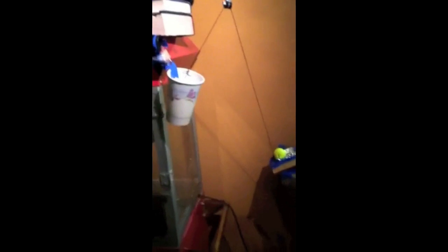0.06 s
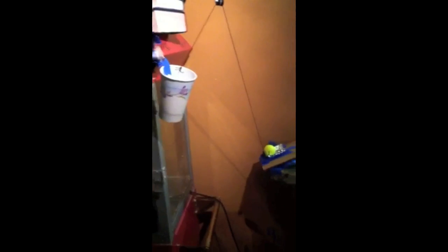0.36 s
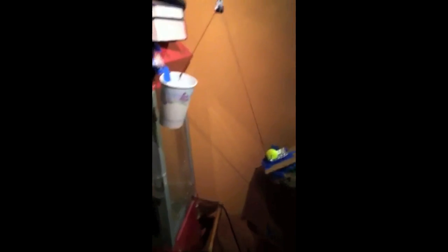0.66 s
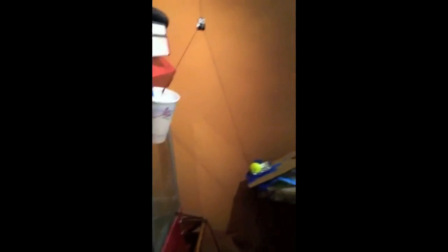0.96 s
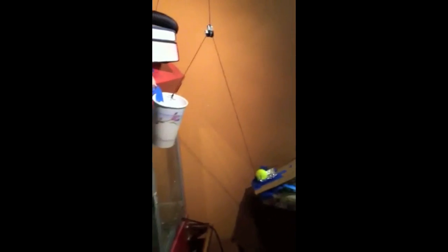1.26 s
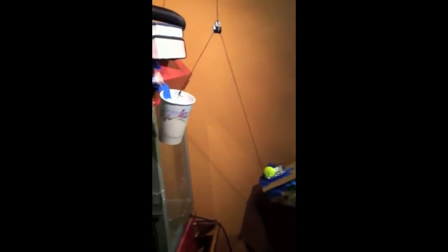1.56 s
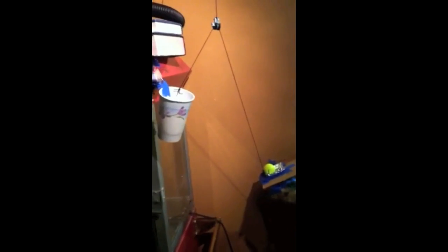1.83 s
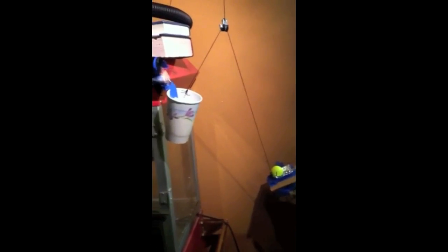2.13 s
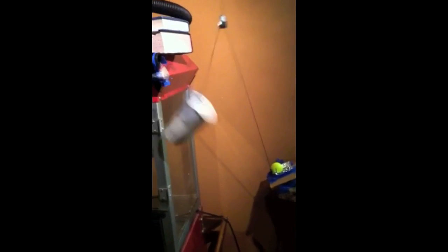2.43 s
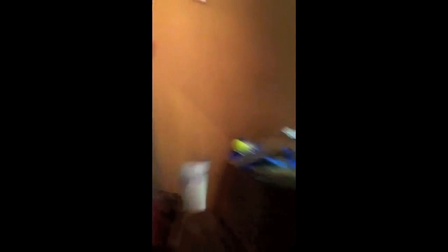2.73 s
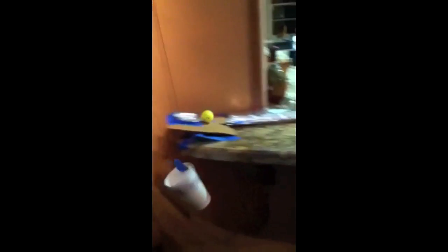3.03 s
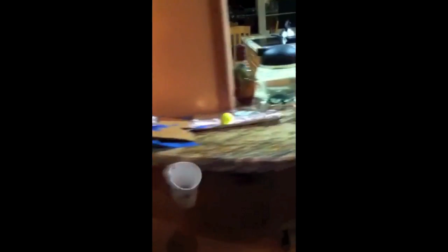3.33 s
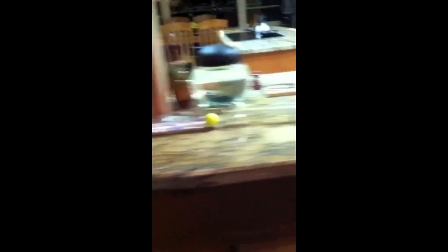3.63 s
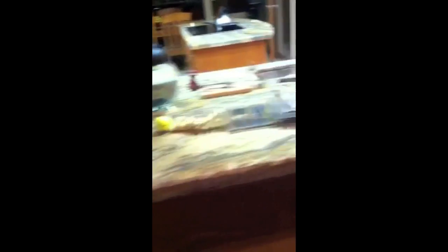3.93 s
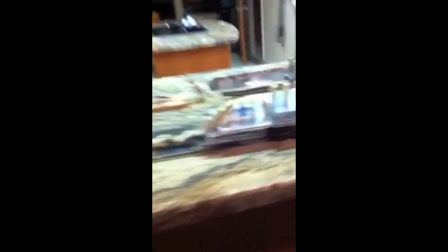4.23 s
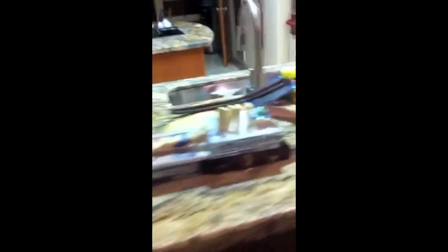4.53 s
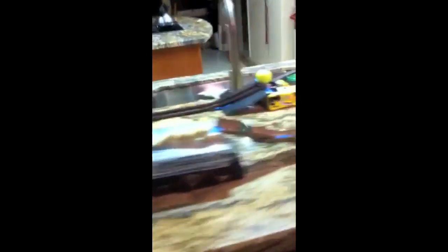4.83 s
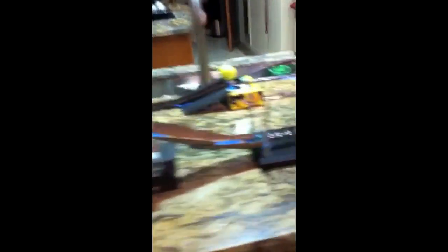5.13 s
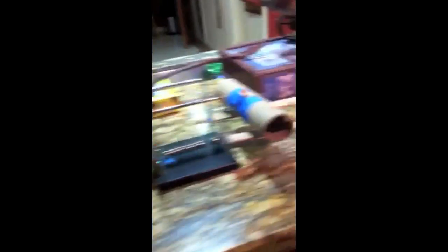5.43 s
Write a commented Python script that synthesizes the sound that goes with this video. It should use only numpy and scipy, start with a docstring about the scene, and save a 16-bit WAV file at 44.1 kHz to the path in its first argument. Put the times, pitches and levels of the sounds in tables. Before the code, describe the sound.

A marble ticks and hums faintly down a ribbed hose, with a few light plastic knocks. A string suddenly snatches and whirs over a pulley as a cup drops. Dull thumps follow, a tennis ball rolls on a stone counter, and a row of dominoes topples with bright clinks, rattling onto a hollow tray. Two hollow clacks and some small clicks finish it, heard nearby in a quiet kitchen.

```python
"""A homemade chain-reaction machine in a quiet kitchen. A marble ticks and hums down a ribbed hose, amid
a few plastic knocks, and drops into a hanging cup. At 2.4 s the cup sinks, its string snatching and
whirring over a pulley, and tips a ramp. A tennis ball thumps onto the stone counter, rolls, and at 3.7 s
topples a row of hard dominoes, which clink and clatter onto a hollow tray. From 4.6 s a hollow part
clacks twice; a few light parts click and jiggle to rest."""
import sys
import numpy as np
from scipy import signal
from scipy.io import wavfile

SR = 44100
rng = np.random.default_rng(int(sys.argv[2]) if len(sys.argv) > 2 else 0)


def put_to_file(sound):
    """Save the sound as 16-bit audio at rate SR, in the file named by the first command-line argument."""
    columns = np.atleast_2d(sound).T  # one column per channel
    safe = np.clip(columns, -1, 1)
    whole_steps = np.round(safe * 32767)
    wavfile.write(sys.argv[1], SR, whole_steps.astype(np.int16))


N = 250488
T = np.arange(N) / SR


def amp(db):
    return 10 ** (np.asarray(db) / 20)


def unit(x):
    return x / np.sqrt(np.mean(x ** 2) + 1e-20)


def sized(x, db):
    """Scale a blow to the energy of 10 ms at this level."""
    return amp(db) * x * np.sqrt(SR / 100) / np.linalg.norm(x)


def add(mix, s, sound):
    part = mix[max(round(s * SR), 0):][:len(sound)]
    part += sound[:len(part)]


def read(points, hz):
    """Interpolate on a log-frequency axis."""
    f, value = np.transpose(points)
    return np.interp(np.log(hz + 1), np.log(f + 1), value)


def soften(x, hz, order=2):
    return signal.lfilter(*signal.butter(order, min(hz, SR / 2 - 1), fs=SR), x)


def no_bass(x, hz):
    return signal.lfilter(*signal.butter(2, hz, "high", fs=SR), x)


def colour(x, spectrum, size=4096):
    """Causal filter; rows of f/Hz, level/dB."""
    hz = abs(np.fft.fftfreq(size, 1 / SR))
    log_gain = np.log(amp(np.maximum(read(spectrum, hz), -90)))
    taps = np.fft.ifft(np.exp(np.conj(signal.hilbert(log_gain)))).real[:size // 2]
    return signal.oaconvolve(x, taps)[:len(x)]


def resonate(x, modes, scale=1):
    """Parallel resonances; scale multiplies their centres, not their widths."""
    return sum(amp(db) * signal.lfilter(*signal.iirpeak(scale * f, scale * f / width_hz, SR), x)
               for f, width_hz, db in modes)


def glide(x, curve, width_hz):
    """One moving resonance; rows of t/s, f/Hz."""
    carrier = np.exp(2j * np.pi * np.cumsum(np.interp(T, *np.transpose(curve))) / SR)
    r = np.exp(-np.pi * width_hz / SR)
    return (carrier * signal.lfilter([(1 - r) ** 2], [1, -2 * r, r * r], x / carrier)).real


def ringing(modes, hz, size=16384):
    """Decaying sines of a struck body."""
    t = T[:size]
    return sum(amp(db) * np.sin(2 * np.pi * hz * ratio * t) * amp(-60 * t / t60_s)
               for ratio, db, t60_s in modes)


def contact(rattle_s, snap, rise_s=.0001, size=8192):
    """Impact force: a spike of height snap, then a dying rattle of tiny rebounds."""
    t = T[:size]
    force = rng.standard_normal(size) * np.exp(-t / rattle_s) * (1 - np.exp(-t / rise_s))
    force /= np.linalg.norm(force)
    force[0] += snap
    return force


def grains(per_s, spread_db):
    """Random tiny impacts of uneven size."""
    size = amp(spread_db * np.minimum(rng.exponential(1, N), 3)) * rng.choice([-1, 1], N)
    return unit(size * (rng.random(N) < per_s / SR))


def after(s, fade_db_per_s):
    """Gain of 1 that fades from time s on."""
    return amp(-fade_db_per_s * np.maximum(T - s, 0))


def swell(start_s, peak_s, build_db, fade_db_per_s):
    """Gain gated on at start_s; builds to 1 at peak_s, then fades. An earlier peak leaves only fade."""
    gate = np.clip((T - start_s) / .003, 0, 1)
    growth_db = build_db * np.clip((T - peak_s) / max(peak_s - start_s, .001), -1, 0)
    return gate * amp(growth_db) * after(peak_s, fade_db_per_s)


# kitchen reverberation: f/Hz, t60/s
ROOM_DECAY = [(150, .48), (400, .4), (1000, .4), (3000, .42), (7000, .41), (15000, .36)]

def room(x, wet_db, size=30000):
    """Direct sound plus dense reflections that die band by band; power is kept."""
    reflections = rng.standard_normal(size) * (rng.random(size) < 5000 / SR) * (T[:size] > .003)
    hz, t, bands = signal.stft(reflections, SR, nperseg=256)
    decay = amp(-60 * t / read(ROOM_DECAY, hz)[:, None])
    tail = signal.istft(bands * decay, SR, nperseg=256)[1]
    wet = signal.fftconvolve(x, tail / np.linalg.norm(tail))[:N]
    return (x + amp(wet_db) * wet) / np.sqrt(1 + amp(wet_db) ** 2)


# kitchen air: f/Hz, level/dB
AIR_SPECTRUM = [(25, -8), (90, -11), (160, 2), (400, 1.5), (1000, -11), (3000, -14), (9000, -22),
                (16000, -44)]

def kitchen_air():
    """Faint, steady, low noise."""
    return amp(-64) * unit(colour(rng.standard_normal(N), AIR_SPECTRUM))


# marble speed: t/s, rate/(ribs/s)
MARBLE_SPEED = [(0.0, 60.68), (0.2, 54.0), (0.4, 51.94), (0.6, 51.99), (0.8, 46.13), (1.0, 35.38),
                (1.2, 30.63), (1.35, 30.12), (1.5, 34.4), (1.7, 34.61), (1.85, 40.82), (2.0, 36.47),
                (2.13, 47.92)]
# ring of the ribs along the hose: t/s, f/Hz
RIB_PITCH = [(0, 6900), (1.0, 6730), (1.76, 6600), (1.86, 5770), (1.9, 5300), (1.96, 6000)]
# rib ticks and hose wall: f/Hz, level/dB
TICK_SPECTRUM = [(530, -7.5), (900, -2), (1480, -24), (1840, -9.5), (2700, -13.5), (3760, -15.5),
                 (5980, -15.5), (6900, -15.5), (9200, -20), (10600, -18), (15500, -37)]
WALL_SPECTRUM = [(50, -36), (100, -5), (160, 2.5), (220, -3.5), (280, -9), (365, 3.5), (430, 1), (510, 5),
                 (640, 4.5), (830, -3), (1400, -10), (1850, -14.5), (3500, -39)]
# air resonances of the hose: f/Hz, width/Hz, level/dB
BORE_MODES = [(157.4, 8.3, 5), (226.6, 3.4, 12.5), (365, 3.9, -2), (511.5, 30, -2.5), (612, 5.7, 5),
              (714, 17, -3)]
CRUISE_RIBS_PER_S, NEARING_S = 45.3, 0.1
EXIT_S, EXIT_DB_PER_S = 2.205, 373

def marble():
    """The marble drops into each groove of the hose: a tick, and a push on the hollow wall."""
    speed = np.interp(T, *np.transpose(MARBLE_SPEED))
    ribs = np.cumsum(speed) / SR + .52
    since_rib_s = (ribs % 1) / speed
    force, sharpness = rng.standard_normal((N, 2))[ribs.astype(int)].T  # one draw per rib
    pulse = (np.exp(-since_rib_s / .006) + .1) * (1 - np.exp(-since_rib_s / .001))
    blows = unit(amp(1.5 * force) * pulse)
    grit = blows * grains(per_s=9800, spread_db=-1.5)
    dull = soften(grit, 5800, order=1)
    bright = amp(2.5 * sharpness) * (grit - dull)
    ticks = unit(colour(dull + bright, TICK_SPECTRUM)) * rolling(speed, power=1.6, mouth_db=7.5)
    ring = unit(glide(grit, RIB_PITCH, width_hz=1100)) * rolling(speed, power=1.5, mouth_db=-15)
    scrape = unit(resonate(grit, [(2000, 590, -1.2), (2800, 640, -0.82)]))
    scrape *= swell(1.85, 2.13, build_db=7.5, fade_db_per_s=120)
    push = (blows + .5) * rng.standard_normal(N)
    wall = unit(colour(push + amp(4) * resonate(push, BORE_MODES), WALL_SPECTRUM))
    wall *= rolling(speed, power=0.79, mouth_db=14.5)
    contacts = amp(-60) * (ticks + amp(-17) * ring) + amp(-62.5) * scrape
    return room(contacts, wet_db=-6) + room(amp(-54.5) * wall, wet_db=-2)


def rolling(speed, power, mouth_db):
    """Marble gain: a power of its speed, shifted by mouth_db towards the open end of the hose."""
    nearness = np.exp(np.minimum(T - EXIT_S, 0) / NEARING_S)
    return (speed / CRUISE_RIBS_PER_S) ** power * amp(mouth_db * nearness) * after(EXIT_S, EXIT_DB_PER_S)


# hose notes: peak t/s, half length/s, f/Hz, level/dB
HOSE_NOTES = [(0.144, 0.15, 223, -55.5), (.2, 0.17, 625, -64), (0.348, .07, 760, -61.5),
              (0.463, .13, 159, -60), (.46, 0.1, 376, -58), (1.683, 0.077, 500, -56),
              (1.786, 0.047, 772, -58.5), (1.924, 0.18, 154, -59.5), (2.164, 0.064, 633, -48.5),
              (2.174, 0.095, 505, -49)]

def hums():
    """The rolling marble feeds one air resonance of the hose after another."""
    out = np.zeros(N)
    for peak_s, half_s, hz, db in HOSE_NOTES:
        note = unit(glide(rng.standard_normal(N), [(0, hz)], width_hz=20.5))
        out += amp(db) * note * np.exp(-((T - peak_s) / half_s) ** 2)
    return out * after(EXIT_S, EXIT_DB_PER_S)


# knocks on plastic: t/s, relative level/dB, cut-off/Hz, shell f/Hz, rattle/s
SHELL_HITS = [(.607, -33.5, 754, 417, 0.00042), (0.698, -34.5, 3300, 525, 0.0011),
              (0.714, -38, 2930, 453, 0.0012), (0.746, -48, 2600, 483, 0.0029),
              (0.998, -41.5, 1180, 350, 0.0072)]
# thin shell: frequency ratio, width/Hz, level/dB
SHELL_MODES = [(1, 200, 0), (1.3, 200, -6), (2.1, 500, -11), (3.15, 600, -5), (5.5, 1400, -11)]

def knocks():
    """Short, nearly dead knocks on thin hollow plastic."""
    out = np.zeros(N)
    for s, db, cutoff_hz, hz, rattle_s in SHELL_HITS:
        push = soften(contact(rattle_s, snap=0.31), cutoff_hz, order=6)
        knock = resonate(no_bass(push, 0.34 * hz), SHELL_MODES, scale=hz)
        add(out, s, sized(knock, db - 8))
    return room(out, wet_db=-11)


# jolts: t/s, level/dB, f/Hz, rise/s
JOLTS = [(0.696, -40, 290, 0.0003), (.717, -42, 200, 0.0013), (2.426, -35, 228, 0.0024),
         (2.49, -43, 163, 0.014), (2.799, -47, 234, .005), (2.807, -44, 338, 0.0029),
         (2.887, -35.5, 225, 0.002), (2.914, -39, 337, 0.0018), (3.049, -35.5, 198, 0.0098),
         (3.06, -45, 70, 0.0032), (3.113, -46, 252, .005), (3.139, -44, 224, 0.0034),
         (5.605, -58.5, 160, 0.013)]

def bumps():
    """A jolted part sways as a whole for a few cycles: a low, round bump."""
    out, t = np.zeros(N), T[:8192]
    for s, db, hz, rise_s in JOLTS:
        sway = t / rise_s * np.exp(-t / rise_s) * np.sin(2 * np.pi * hz * t)
        add(out, s, sized(no_bass(sway, 0.74 * hz), db))
    return room(out, wet_db=-5)


# small parts touching, and the sharpest cracks of colliding tiles: t/s, relative level/dB, rattle/s, low cut/Hz
CLICK_HITS = [(1.088, -55, 0.004, 5000), (1.278, -55, 0.0045, 3000), (1.3422, -51.5, 0.0043, 3000),
              (1.8617, -50.5, 0.0021, 4500), (1.911, -58, 0.0025, 3500), (1.9332, -54, 0.0017, 4450),
              (1.963, -55, .003, 2000), (2.013, -54, .003, 1500), (2.14, -41.5, 0.0053, 2950),
              (2.208, -42, 0.0077, 1500), (2.384, -29.5, 0.0076, 500), (2.881, -31, 0.016, 1000),
              (3.046, -26, 0.0091, 1380), (3.066, -37, 0.0025, 900), (3.2015, -36, 0.019, 7650),
              (3.251, -35, 0.035, 2010), (3.42, -35, 0.021, 7040), (3.608, -45, 0.028, 3930),
              (3.7101, -21, 0.00024, 2040), (3.748, -23, 0.0014, 9050), (3.753, -17.5, 0.0062, 9300),
              (4.371, -26.5, 0.0081, 9000), (4.423, -17.5, 0.0091, 3870), (4.642, -35, 0.0062, 9002),
              (4.799, -26, 0.014, 1100), (4.836, -27, 0.0057, 895), (4.86, -30, 0.0009, 1510),
              (4.886, -22.5, 0.0089, 10600), (4.933, -27, 0.0089, 9500), (5.0122, -23.5, 0.00052, 2170),
              (5.018, -20, 0.009, 3350), (5.251, -40, 0.014, 4070), (5.2736, -27, 0.0095, 4960),
              (5.337, -35.5, 0.0034, 1200), (5.393, -37, 0.0077, 2030), (5.559, -42.5, 0.032, 1490),
              (5.646, -50, 0.036, 3080)]
# hard contact: f/Hz, level/dB
CLICK_SPECTRUM = [(100, -17), (500, 5.5), (900, 4), (2000, 0.5), (4000, -1.5), (6800, 2), (10000, -2.5),
                  (13000, -12.5), (15800, -27)]

def clicks():
    """Small hard parts touch and rebound, and toppling tiles crack sharply; the smaller the part, the thinner
    its click."""
    out = np.zeros(N)
    for s, db, rattle_s, low_hz in CLICK_HITS:
        click = colour(contact(rattle_s, snap=0.36), CLICK_SPECTRUM)
        add(out, s, sized(no_bass(click, low_hz), db - 7))
    return room(out, wet_db=-7)


# string snatches: t/s, added gain/dB, decay/s
STRING_JERKS = [(2.43, -2, 0.014), (2.472, -13, .01), (2.494, 3, 0.019), (2.543, -9, 0.0066),
                (2.579, -18, 0.0058), (2.599, 0.5, 0.032), (2.655, -2, 0.02), (2.718, -1, 0.011)]
# string friction: f/Hz, level/dB
HISS_SPECTRUM = [(710, -21), (1200, -18), (1520, 6), (1680, -3), (1870, -3), (2320, -7.5), (9210, -5),
                 (12300, -12), (15800, -27)]
# hanging cup: f/Hz, width/Hz, level/dB
CUP_MODES = [(165, 25, -17), (232, 40, -13), (275, 30, -15), (460, 60, -14), (635, 50, -3), (747, 42, -2),
             (835, 60, -6), (950, 60, -10), (1070, 45, -6), (1130, 45, -8), (1240, 60, -16),
             (1510, 70, -12), (1860, 90, -12), (2060, 70, -18), (2470, 80, -21)]
# string whirr and pulley squeak: t/s, f/Hz
WHIRR_PITCH = [(2.38, 750), (2.5, 754), (2.55, 860), (2.66, 820), (2.73, 735), (2.8, 713)]
SQUEAK_PITCH = [(2.43, 1800), (2.5, 1860), (2.54, 1900), (2.57, 2020), (2.62, 2050)]
PULL_S, FASTEST_S, WHIRR_PEAK_S, STOP_S = 2.381, 2.486, 2.592, 2.805

def pulley():
    """The string slips and snatches over the squeaking pulley; the cup drones like a soundboard."""
    slips = grains(per_s=1800, spread_db=1)
    jerks = sum(amp(db) * (T > s) * np.exp(-np.maximum(T - s, 0) / decay_s)
                for s, db, decay_s in STRING_JERKS)
    rub = amp(-39) * swell(PULL_S, FASTEST_S, build_db=0.5, fade_db_per_s=17.5)
    surge = amp(-32) * swell(PULL_S, FASTEST_S, build_db=24, fade_db_per_s=210)
    hiss = unit(colour(slips, HISS_SPECTRUM)) * (rub + surge)
    hiss *= (1 + 0.5 * jerks) * after(STOP_S, fade_db_per_s=598)
    cup_radiation = [(60, -38), (200, 3), (500, -0.5), (750, 5.5), (3000, -4.5)]  # f/Hz, level/dB
    drone = unit(colour(resonate(slips, CUP_MODES), cup_radiation))
    drone *= amp(-30) * swell(PULL_S, FASTEST_S, build_db=3, fade_db_per_s=66)
    whirr = unit(glide(slips, WHIRR_PITCH, width_hz=190))
    whirr *= amp(-40) * swell(PULL_S, WHIRR_PEAK_S, build_db=4, fade_db_per_s=90)
    squeak = unit(glide(slips, SQUEAK_PITCH, width_hz=220))
    squeak *= amp(-42.5) * swell(PULL_S, FASTEST_S, build_db=11, fade_db_per_s=88)
    tones = (drone + whirr + squeak) * (1 + jerks) * after(STOP_S, fade_db_per_s=193)
    return room(hiss, wet_db=-6) + room(tones, wet_db=-12)


# blows of cup, ramp and ball: t/s, relative level/dB, cut-off/Hz, rattle/s, ring f/Hz, ring offset/dB
SOFT_HITS = [(2.495, -30, 592, 0.0032, 620, -8), (2.803, -45, 500, 0.018, 547, -11),
             (2.872, -27, 700, 0.0049, 763, -12), (2.885, -22.5, 1640, 0.01, 557, -15),
             (3.05, -14.5, 1140, 0.0049, 600, -4), (3.112, -30, 1100, 0.0073, 607, -8),
             (3.265, -40.5, 826, 0.022, 700, -1), (3.316, -29.5, 990, 0.027, 730, -8),
             (3.363, -29.5, 1050, 0.035, 687, -11), (3.492, -33, 920, 0.035, 782, -10.5),
             (3.678, -31, 1540, 0.03, 649, -9)]
# ramp on the counter: frequency ratio, level/dB, t60/s
RAMP_MODES = [(.352, -16, .16), (.607, -13, .06), (.79, -12, .07), (.945, -4, .07), (1, -1, .12),
              (1.11, -2, .07), (1.51, -6, .11), (1.83, -9, .1), (2.02, -13, .07), (2.54, -19, .08),
              (2.85, -16, .09), (3.43, -22, .05)]
# dull rattle of loose parts: f/Hz, level/dB
THUD_SPECTRUM = [(30, -34), (110, -28), (190, -12), (270, -8), (360, -6), (420, -8), (520, -1), (640, 0),
                 (750, -6), (890, -2), (1010, -8), (1150, -5), (1400, -10), (1800, -8), (2300, -12),
                 (3200, -11), (6000, -12), (12000, -20)]
FIRST_HOP_S, HOP_RATIO, HOP_RATTLE_S = 0.037, 0.92, 0.031
FIRST_LOSS_DB, NEXT_LOSS_DB = 17.5, 6.5

def thumps():
    """Soft heavy blows rattle loose parts and ring the ramp, then bounce in three shrinking hops."""
    out = np.zeros(N)
    for s, db, cutoff_hz, rattle_s, hz, ring_db in SOFT_HITS:
        ramp = ringing(RAMP_MODES, hz)
        ramp *= (1 - np.exp(-T[:len(ramp)] / 0.0016)) ** 2
        for hop in range(4):
            rebounds = soften(contact(rattle_s, snap=0.17, rise_s=0.00092), cutoff_hz)
            push = contact(rattle_s, snap=0.0081 / rattle_s)
            ring = soften(signal.fftconvolve(push, ramp), 1.6 * cutoff_hz)
            add(out, s, sized(colour(rebounds, THUD_SPECTRUM), db - 5))
            add(out, s - .003, sized(ring, db - 4 + ring_db))
            s += FIRST_HOP_S * HOP_RATIO ** hop
            db -= NEXT_LOSS_DB if hop else FIRST_LOSS_DB
            rattle_s = HOP_RATTLE_S
    return room(out, wet_db=-6)


# loose parts jiggling: t/s, length/s, initial level/dB
JIGGLE_SPANS = [(3.34, 0.48, -56.5), (5.241, 0.19, -48.5), (5.378, 0.1, -54), (5.626, 0.073, -53.5)]

def jiggles():
    """Jolted parts tick faintly at random as they come to rest."""
    gain = sum(amp(db) * (T > s) * (T < s + length_s) * after(s, fade_db_per_s=31)
               for s, length_s, db in JIGGLE_SPANS)
    ticks = colour(grains(per_s=460, spread_db=10), CLICK_SPECTRUM)
    return room(unit(no_bass(ticks, 2720)) * gain, wet_db=0)


# hollow ball: f/Hz, width/Hz, level/dB
BALL_MODES = [(403, 61, -11), (580, 20, -8), (667, 11, 3)]
# its main note: t/s, f/Hz
BALL_PITCH = [(3.7, 315), (3.98, 304), (4.12, 354)]

def ball():
    """The rolling tennis ball rumbles and fades; its note dips, then rises."""
    grit = grains(per_s=830, spread_db=-6.5)
    note = unit(glide(grit, BALL_PITCH, width_hz=47))
    body = unit(no_bass(soften(resonate(grit, BALL_MODES), 1100), 260))
    gain = amp(-46.5) * swell(3.68, 3.55, build_db=1.5, fade_db_per_s=16.5)  # enters already fading
    return room((note + amp(2) * body) * gain, wet_db=-17)


# hardest domino collisions: t/s, relative level/dB, f/Hz, rattle/s
TILE_HITS = [(3.686, -36, 7300, 0.003), (3.7098, -10.5, 7020, .002), (3.715, -11, 8200, 0.0044),
             (3.7228, -11, 7240, 0.0032), (3.7474, -19, 7300, 0.0038), (3.7792, -11.5, 8100, 0.0017),
             (3.788, -10, 7094, 0.0016), (3.8165, -21, 8000, .001), (3.860, -9.5, 7240, 0.0093),
             (3.891, -8, 7190, 0.0018), (3.8968, -2.5, 7180, 0.0053), (3.9073, -11, 6910, 0.0029),
             (3.9152, -11, 7230, 0.0015), (3.9434, -8.5, 6800, 0.005), (3.9605, -6.5, 7070, 0.001),
             (3.9665, -10.5, 6960, 0.002), (3.98, -14, 7070, .001), (3.987, -12, 7420, .001),
             (3.9984, -5.5, 7220, 0.0055), (4.019, -17, 7290, 0.0022), (4.055, -14, 7320, 0.0021),
             (4.0812, -10.5, 7070, 0.0047), (4.127, -11.5, 7110, 0.0021), (4.1769, -12.5, 7030, 0.0036),
             (4.246, -17.5, 7060, 0.00074), (4.2827, -24.5, 6980, 0.0019), (4.3029, -14.5, 7060, 0.0032),
             (4.336, -14, 6840, 0.0047), (4.370, -12, 6890, .006), (4.3884, -11, 6840, 0.0007),
             (4.398, -12, 6860, 0.0034), (4.407, -15, 7020, 0.0011), (4.4105, -19, 7030, 0.00079),
             (4.436, -18, 7900, 0.0026), (4.4437, -15, 7230, 0.0014), (4.4637, -14, 8380, 0.0014),
             (4.479, -20, 7500, 0.0018), (4.5394, -19.5, 6820, 0.0011), (4.5725, -20, 6870, 0.0039),
             (4.6066, -18.5, 6750, 0.004), (4.643, -8.5, 7380, 0.0066), (4.8617, -17.5, 7060, 0.01),
             (4.885, -12.5, 6970, 0.0025), (4.932, -12.5, 7030, 0.0092), (4.9828, -12, 7110, 0.012),
             (5.0098, -17, 7000, 0.0049), (5.019, -22, 6920, 0.0039)]
# one tile: frequency ratio, level/dB, t60/s
TILE_MODES = [(1, 0, .05), (.965, -9, .03), (1.035, -9, .03), (1.085, -18, .025), (1.125, -14, .025),
              (1.18, -15, .02), (1.33, -19, .015)]
FREE_TILE_HZ, HALF_RING_OFFSET_HZ = 7020, 340
TILE_RISE_S, SCUFF_S = .0003, .007

def dominoes():
    """Each collision cracks and rings a tile; no two strike the same spot, so the partials vary."""
    rings, cracks = np.zeros((2, N))
    for s, db, hz, rattle_s in TILE_HITS:
        scatter = rng.uniform(-1.6, 1, (len(TILE_MODES), 2))
        # a tile pressed against its neighbours is off pitch and damped
        freedom = 1 / (1 + abs(hz - FREE_TILE_HZ) / HALF_RING_OFFSET_HZ)
        modes = [(ratio + 0.27 * (ratio - 1) * detune, mode_db - 2.5 * loss, t60_s * freedom)
                 for (ratio, mode_db, t60_s), (detune, loss) in zip(TILE_MODES, scatter)]
        tile = ringing(modes, hz, size=4096) * (1 - np.exp(-T[:4096] / TILE_RISE_S))
        clink = signal.fftconvolve(contact(rattle_s, snap=0.49, rise_s=0.0011), tile)
        crack = colour(contact(SCUFF_S + rattle_s, snap=0.03, rise_s=0.00069), CLICK_SPECTRUM)
        add(rings, s, sized(clink, db - 11))
        add(cracks, s, sized(crack, db - 20.5))
    return room(soften(rings + no_bass(cracks, 3080), 12000, order=8), wet_db=-4)


# toppling runs: start t/s, chatter peak t/s, relative level/dB, clatter peak t/s, relative level/dB
TOPPLE_RUNS = [(3.707, 3.974, -21.5, 4.12, -33.5), (4.299, 4.407, -29, 4.27, -35),
               (4.587, 4.692, -46, 4.37, -41), (4.861, 4.943, -35, 4.73, -38.5)]
# tiles and stone counter: f/Hz, level/dB
CHATTER_SPECTRUM = [(2000, -28), (3500, -19), (5500, -14), (6400, -10), (6800, 1), (7070, 2), (7320, 1),
                    (7550, -8), (8150, -5), (8900, -13), (9450, -11), (11500, -17), (13000, -25),
                    (15000, -50)]
STONE_SPECTRUM = [(50, -28), (130, -33), (220, -20), (310, -4), (420, -8), (700, 0), (1200, -1), (1900, -4),
                  (3000, -9), (5000, -12), (8000, -30)]

def settling():
    """Falling tiles chatter on each other, clink at random pitches and clatter on the stone."""
    bounces = grains(per_s=1100, spread_db=5)
    on_tiles = sum(amp(db) * swell(start_s, peak_s, build_db=18, fade_db_per_s=95)
                   for start_s, peak_s, db, _, _ in TOPPLE_RUNS)
    on_stone = sum(amp(db) * swell(start_s, peak_s, build_db=10, fade_db_per_s=47)
                   for start_s, _, _, peak_s, db in TOPPLE_RUNS)
    chatter = amp(-2.5) * unit(colour(bounces, CHATTER_SPECTRUM)) * on_tiles
    clatter = amp(-1.5) * unit(colour(bounces, STONE_SPECTRUM)) * on_stone
    rings = sum(signal.fftconvolve(grains(per_s=16, spread_db=10), ringing(TILE_MODES, hz))[:N]
                for hz in rng.uniform(6650, 7310, size=8))
    clinks = amp(-2.5) * unit(rings) * on_tiles
    return room(chatter, wet_db=5) + room(clinks, wet_db=-20) + room(clatter, wet_db=0)


# landings on the tray: t/s, level/dB, rattle/s
TRAY_HITS = [(3.99, -46, 0.013), (4.027, -28.5, 0.015), (4.055, -27.5, 0.016), (4.088, -27.5, 0.016),
             (4.125, -32.5, 0.011), (4.152, -42, 0.012), (4.33, -41, 0.011), (4.371, -29.5, 0.012),
             (4.405, -30.5, 0.036), (4.655, -35.5, 0.0048), (4.699, -33.5, 0.037), (5.363, -50, 0.058)]
# tray: f/Hz, width/Hz, level/dB
TRAY_MODES = [(355, 30, -8), (538, 25, 2), (660, 50, -4), (760, 80, 0), (969, 40, 1), (1130, 90, -4),
              (1450, 30, -3), (1830, 40, -4), (2300, 60, -8)]

def tray():
    """Tiles and small parts land on a hollow tray and rattle on it."""
    out = np.zeros(N)
    for s, db, rattle_s in TRAY_HITS:
        ring = resonate(contact(rattle_s, snap=0.32), TRAY_MODES)
        add(out, s, sized(no_bass(soften(ring, 4400), 334), db))
    return room(out, wet_db=-6.5)


# hollow part tipping over: t/s, level/dB, f/Hz
CLACK_HITS = [(4.641, -34, 614), (5.0615, -33.5, 700)]
# that part: frequency ratio, width/Hz, level/dB
CLACK_MODES = [(1, 130, 0), (1.12, 90, -7), (2.4, 300, -9), (3.1, 260, 0)]

def clacks():
    """A light hollow part lands; a low and a high pair of resonances ring briefly."""
    out = np.zeros(N)
    for s, db, hz in CLACK_HITS:
        push = soften(contact(rattle_s=.0012, snap=2), 3.3 * hz, order=10)
        clack = resonate(no_bass(push, .7 * hz), CLACK_MODES, scale=hz)
        add(out, s, sized(clack, db))
    return room(out, wet_db=-6.5)


def scene():
    """The machine over the kitchen air, mono."""
    air = kitchen_air()
    blows = thumps() + bumps() + knocks() + clacks() + clicks() + jiggles()
    return (air + marble() + hums() + blows + pulley() + ball() + dominoes() + settling() + tray())[None]


MIC_LOW_HZ, BAND_LIMIT_HZ = 140, 16000

def record(dry):
    """A small microphone loses the deep bass; then the band limit."""
    taps = signal.firwin(255, BAND_LIMIT_HZ, window=("kaiser", 8), fs=SR)
    return signal.oaconvolve(no_bass(dry, MIC_LOW_HZ), taps[None], "same")


dry = scene()
out = record(dry)
put_to_file(out)
```